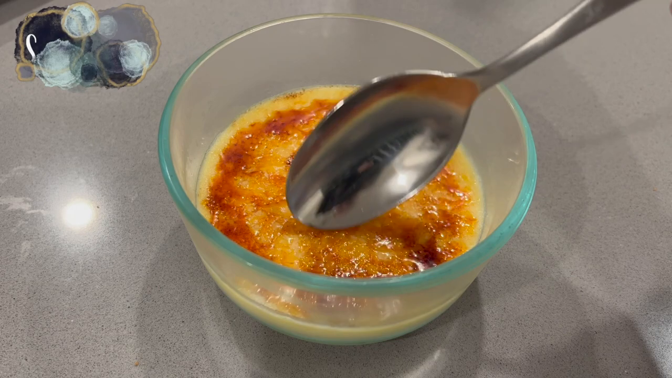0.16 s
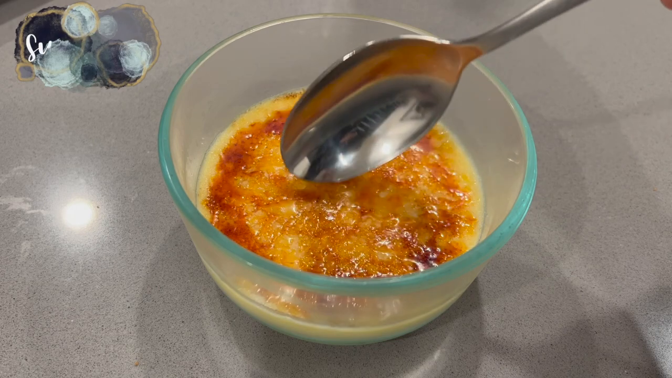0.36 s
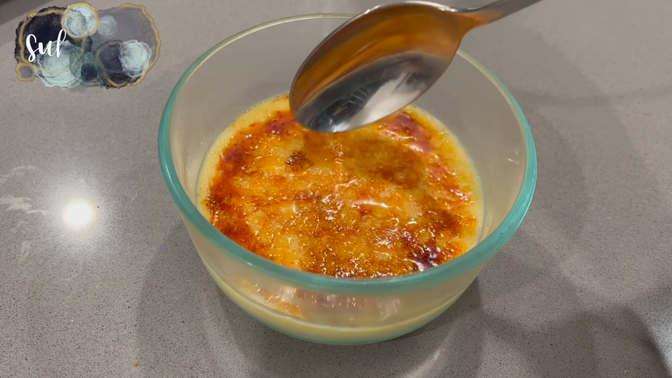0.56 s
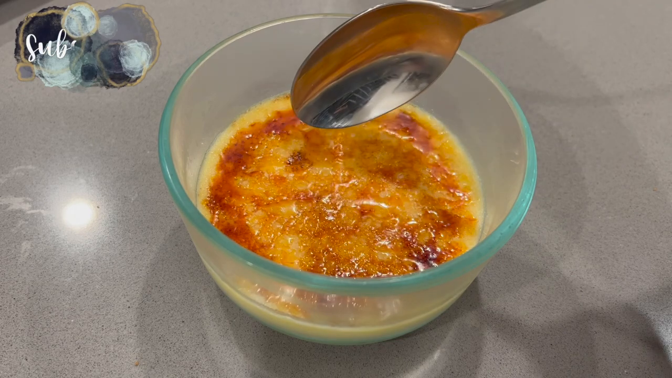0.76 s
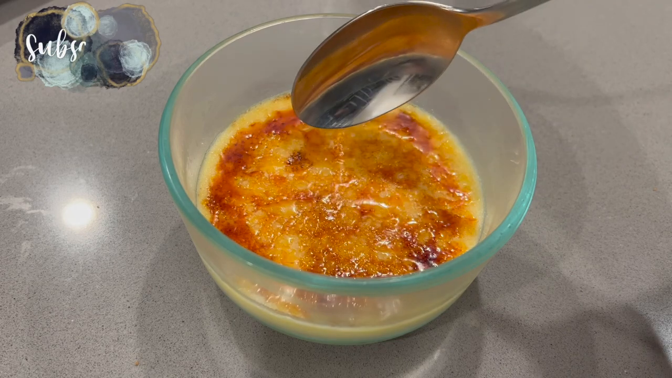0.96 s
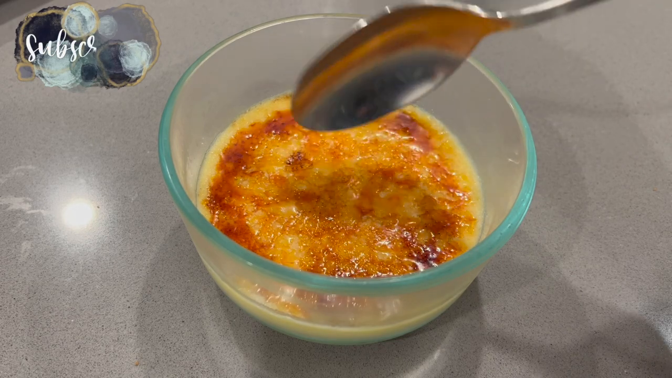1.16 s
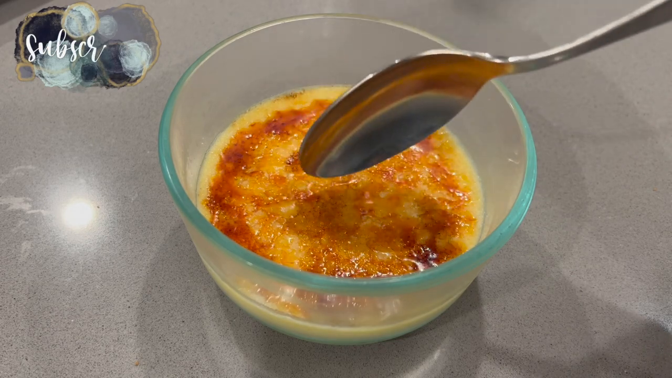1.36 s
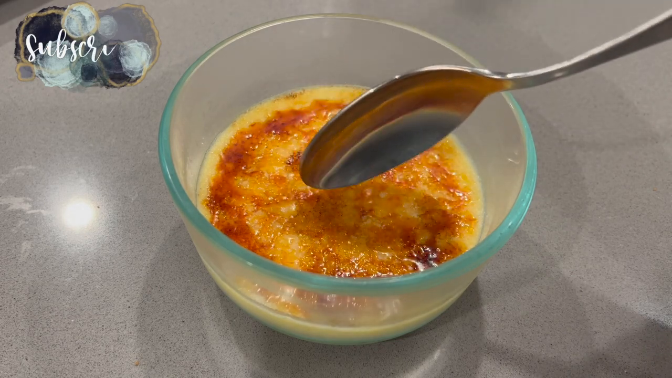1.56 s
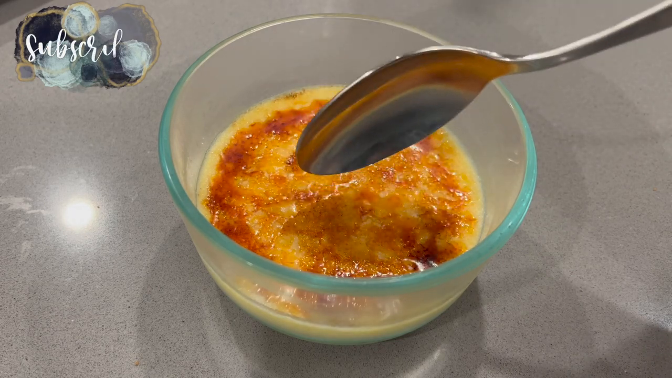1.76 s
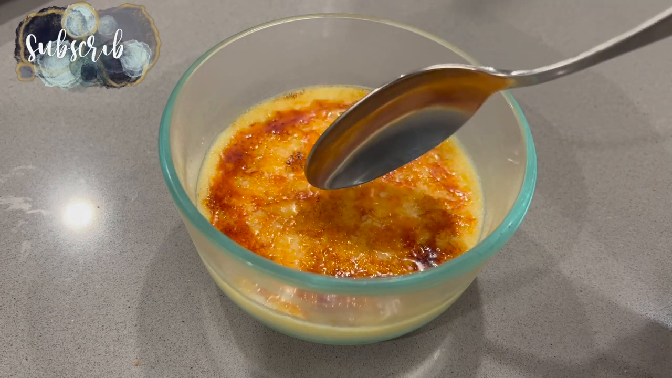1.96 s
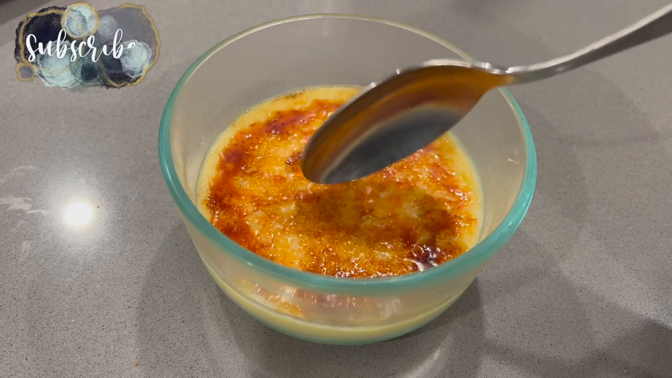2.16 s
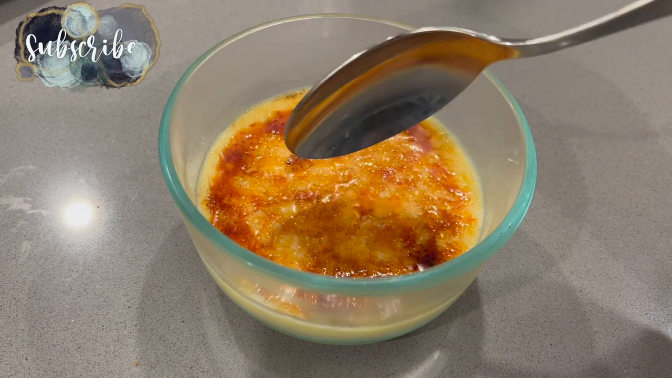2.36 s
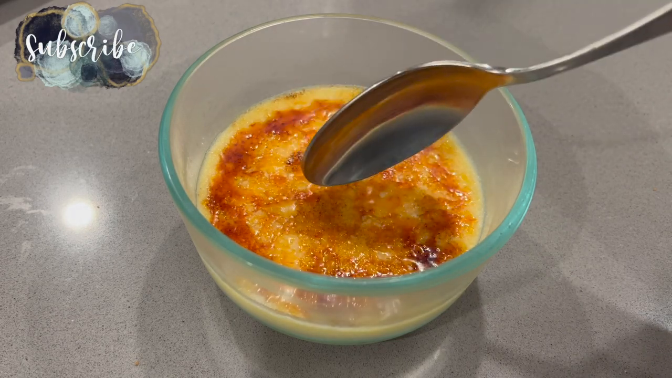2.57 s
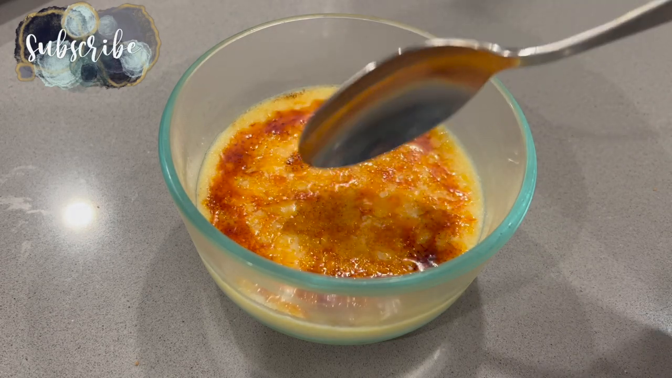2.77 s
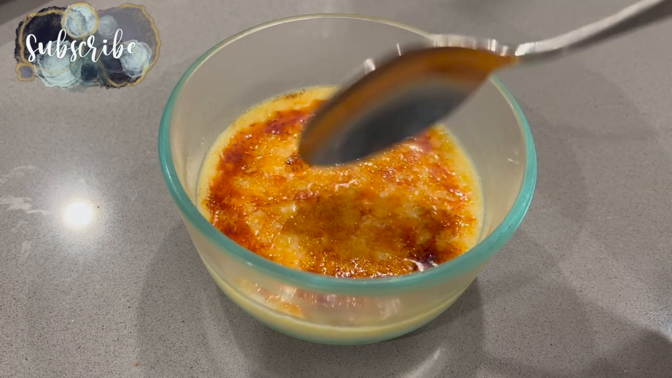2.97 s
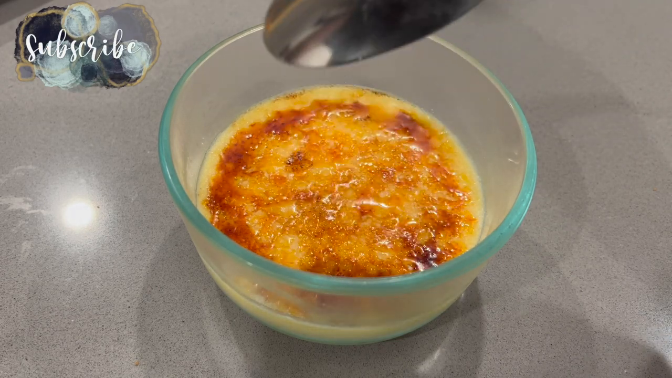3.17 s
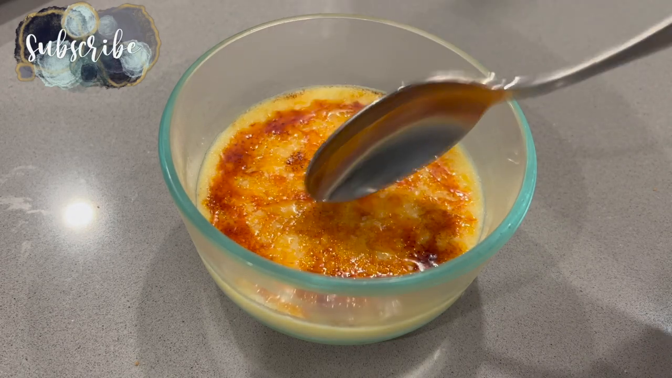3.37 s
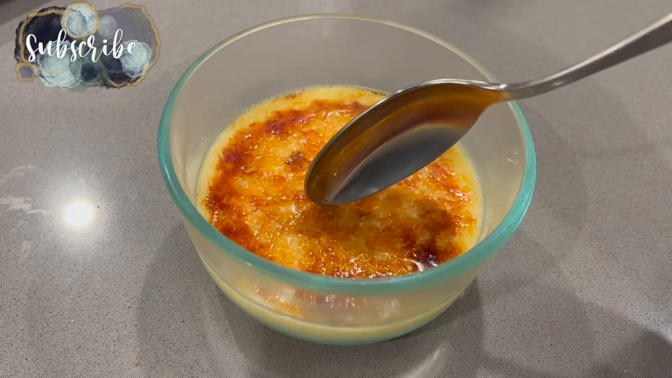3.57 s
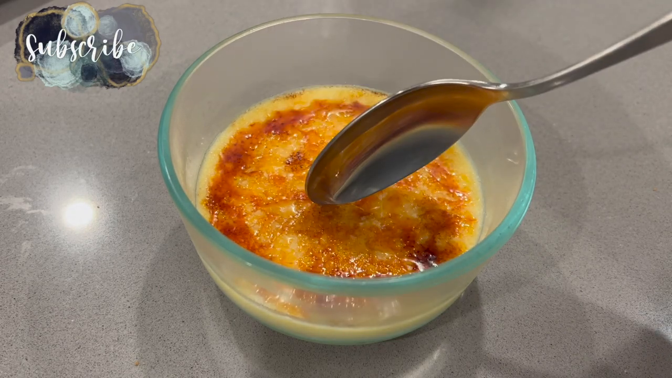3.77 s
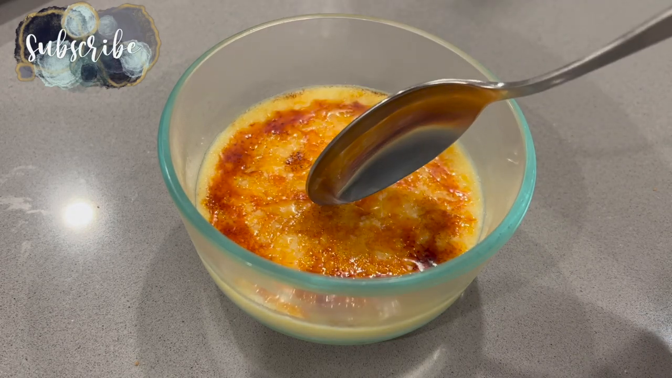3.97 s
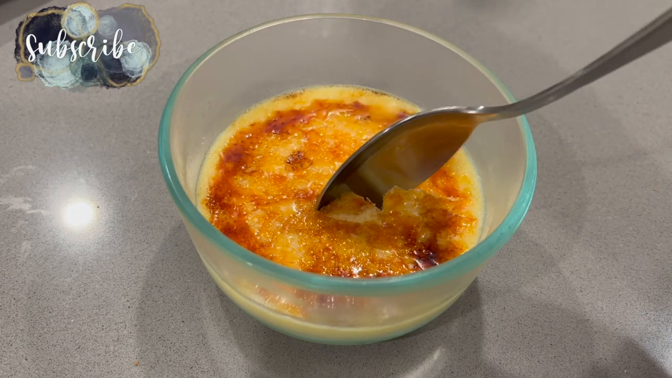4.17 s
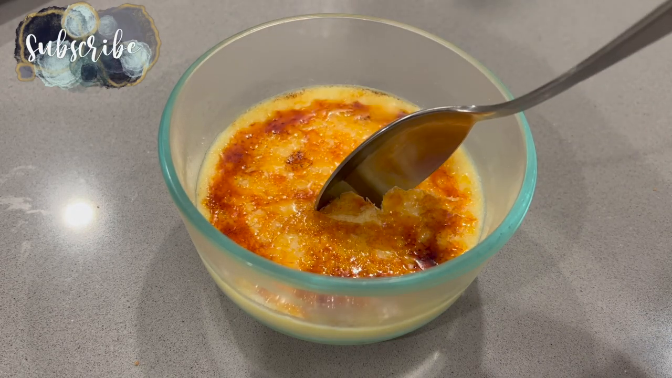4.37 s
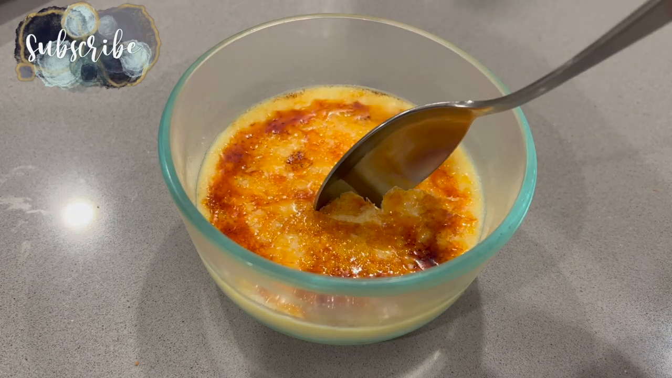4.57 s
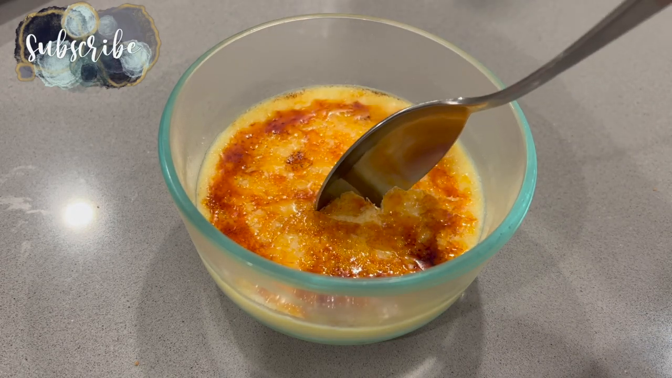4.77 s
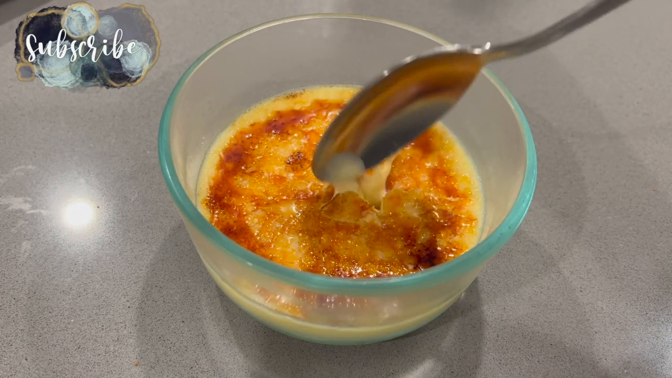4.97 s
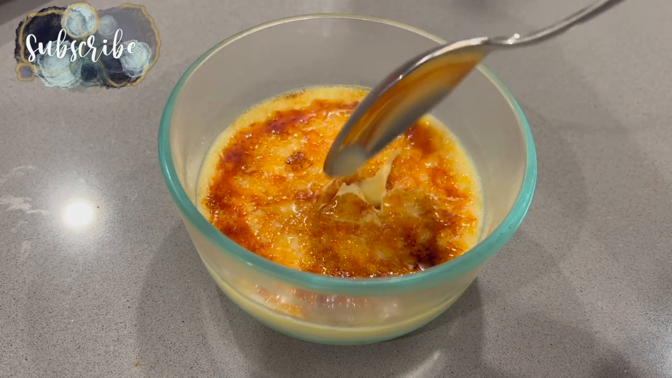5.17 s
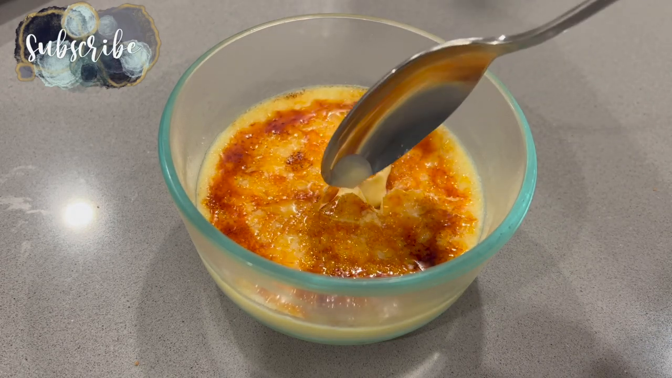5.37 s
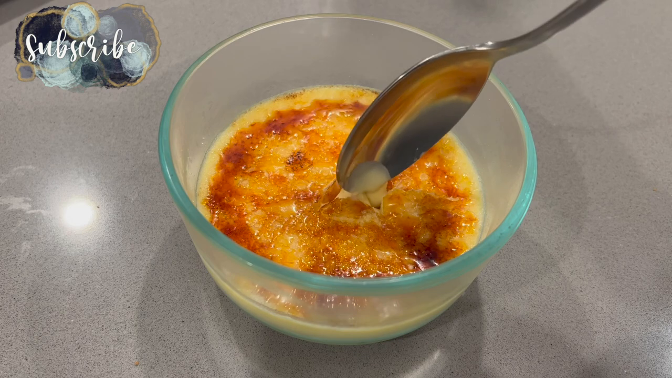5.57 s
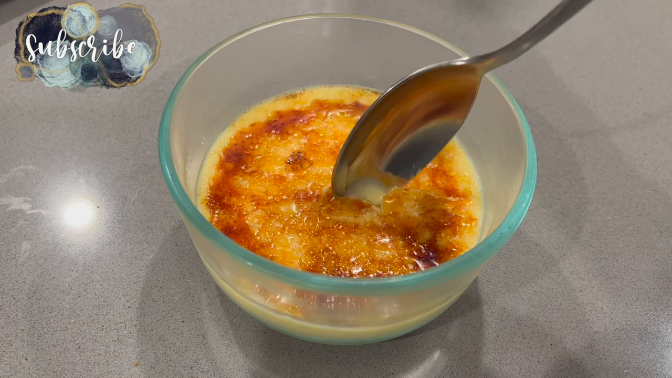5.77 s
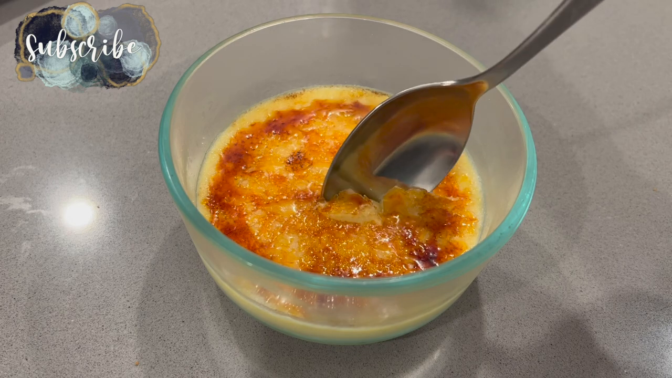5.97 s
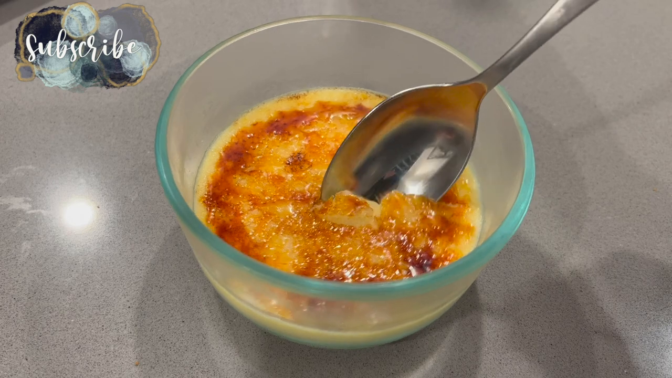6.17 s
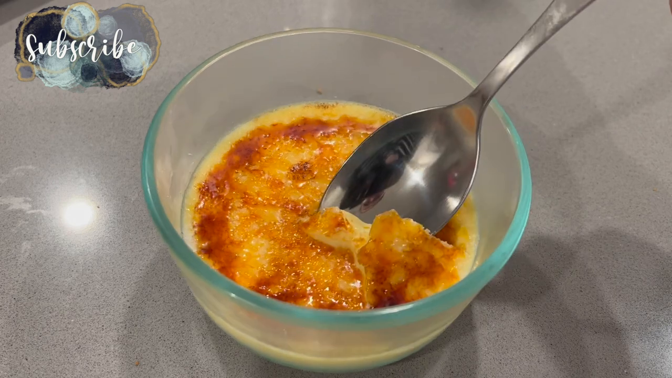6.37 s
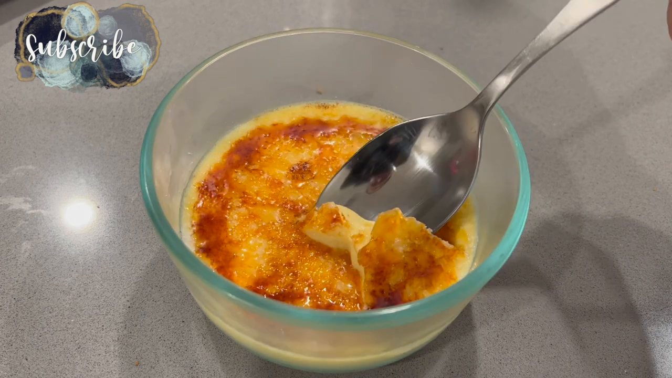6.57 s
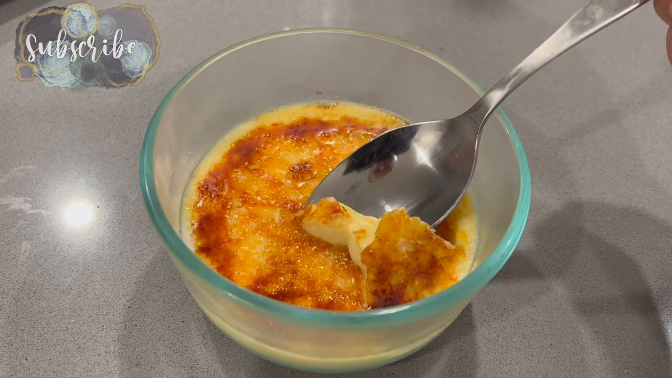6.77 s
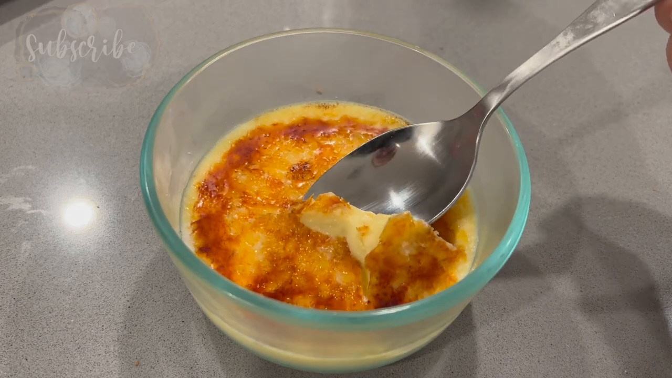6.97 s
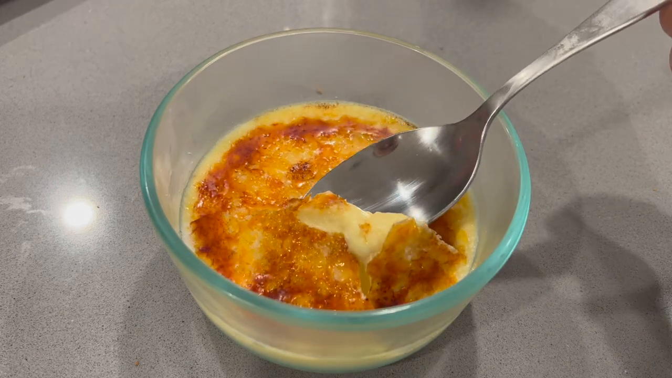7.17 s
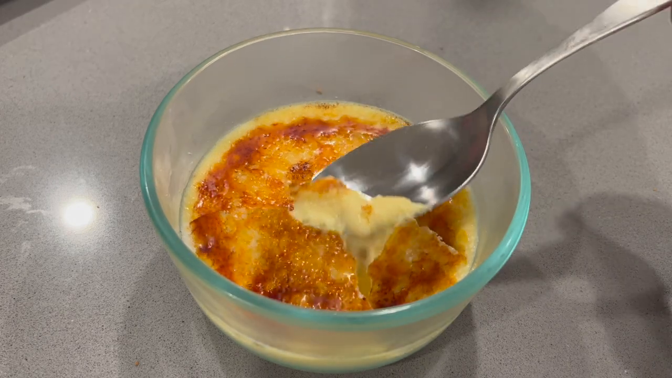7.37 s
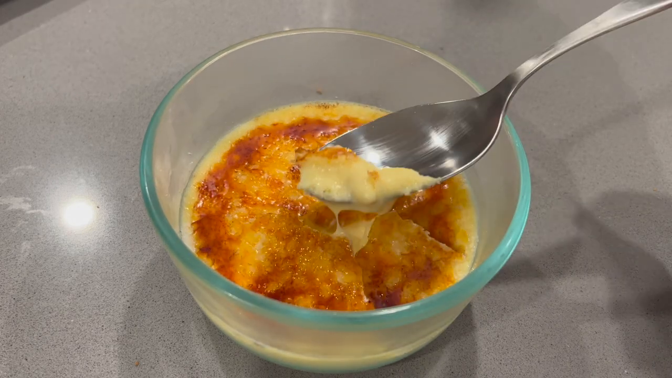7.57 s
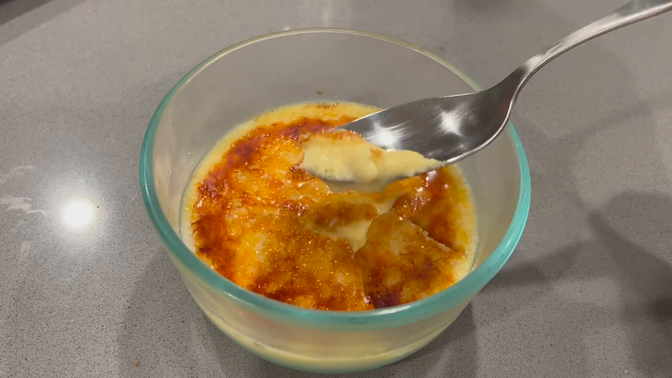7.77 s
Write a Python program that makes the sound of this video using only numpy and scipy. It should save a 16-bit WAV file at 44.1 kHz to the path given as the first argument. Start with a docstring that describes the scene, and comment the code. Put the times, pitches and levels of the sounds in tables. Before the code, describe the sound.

A metal spoon scrapes and taps a hard caramelized sugar crust in a glass dish, then cracks it sharply and crunches quietly through the shards.

```python
"""Close by, a steel spoon skids over the burnt sugar on a glass dish of custard, taps it five times,
then strikes harder until it cracks. It digs in, clinks, crunches the shards and clinks once more.
Blows are struck modes and bursts of noise; rubs are many tiny slips exciting the same bodies.
The kitchen answers briefly as decaying noise; behind it low rumble and an appliance's sine hum run on,
and near the end a far motor, a rising tone, spins up."""
import sys
import numpy as np
from scipy import signal
from scipy.fft import rfft, irfft, next_fast_len
from scipy.io import wavfile
from scipy.ndimage import uniform_filter1d, map_coordinates

SR = 44100
rng = np.random.default_rng(int(sys.argv[2]) if len(sys.argv) > 2 else 0)


def store_wav(level_fs):
    """Save 16-bit WAV to argv[1]."""
    pcm = np.round(np.clip(np.atleast_2d(level_fs), -1, 1) * 32767)
    wavfile.write(sys.argv[1], SR, pcm.T.astype(np.int16))


N = 345038

# spoon blows on the crust: t/s, knock level/dB, edge/dB (sugar's crack relative to the knock), room send/dB
BLOWS = [(1.551, -24, -16.5, -13), (1.8603, -25.5, -21.5, -13), (2.164, -23, -17, -13.5),
         (2.4735, -26.5, -16, -14), (2.81, -23.5, -16.5, -13), (3.357, -18, -10, -6),
         (4.1263, -26.5, -7.5, -5.5), (4.1523, -18.5, -1, -7.5), (5.8795, -30.5, -6.5, -13.5)]
# Mode tables: f/Hz, relative level/dB, undamped t60/s, left minus right/dB
# the custard's soft thump
CUSTARD_MODES = [(160, -3.5, 0.029, 0.5), (212.5, -4, 0.068, 1.5), (243, -14, 0.11, -0.5)]
# the dish's knock
DISH_MODES = [(431, -10, 0.023, 0.5), (554, -8, 0.025, 1), (746.4, 3, 0.022, 3.5), (805, -4, 0.032, 2.5),
              (961.7, -9.5, 0.049, 3), (1193, 0, 0.022, 3)]
# the sugar crust's clack
CRUST_MODES = [(1230.5, 5, 0.014, 6.5), (1637, -2.5, 0.0073, 4.5), (1731, -2, 0.018, 1.5),
               (2204, -6.5, 0.015, 14.5), (2560, -2, 0.0071, -4.5), (2860, -0.5, 0.0045, 11),
               (3931, -12.5, 0.0036, 0.5)]
# the spoon held against the crust
PRESSED_SPOON_MODES = [(5480, -4, .045, 2), (5720, -3.5, .045, 2), (8700, 2, .025, -2), (12300, -5, .02, 0),
                       (15300, -5, .02, 0)]
# cracking sugar: f/Hz, relative level/dB per Hz
CRACK_SPECTRUM = [(1500, -12), (3200, -0.5), (4300, -8.5), (5500, -2), (6800, -3.5), (8700, -2), (9500, -2),
                  (10400, -15), (12200, 2), (13400, -5), (15300, 0)]
# sugar grains rubbing on steel: f/Hz, relative level/dB per Hz
GRIT_SPECTRUM = [(1500, -3.5), (4300, -9), (6500, 2.5), (9000, -2.5), (10500, -12), (12300, 1), (13600, -8),
                 (15200, -3)]

LEVEL_SPAN = SR // 100  # a contact's level is its energy spread over 10 ms
TAP_EDGE_DB = -17  # the edge of a tap that leaves the crust whole
LIGHT_PITCH = 0.94  # pitch factor of the dish under a light contact


def blows():
    """Blows heard direct and off the walls: the more the sugar cracks, the more clack and less thump."""
    # the glass wall ringing on: f/Hz, relative level/dB, t60/s, left minus right/dB
    glass_modes = [(1207, 0, .42, 2), (1305, -1, .45, 2), (1580, -10, .4, 0), (1940, -11, .35, 0)]
    glass_db = -26.5  # each of the two glass rings, over the knock
    clack_db, clack_per_edge = -11.5, 0.79  # over the knock; growth with the edge, dB per dB
    thump_db, thump_per_edge = -4, 0.57  # over the knock; a breaking crust passes less on, dB per dB
    break_edge_db, broken_pitch = -4.5, 1.16  # above this edge the crust gives way; knock's pitch factor
    out = np.zeros((2, N))
    for s, knock_db, edge_db, room_db in BLOWS:
        bite_db = edge_db - TAP_EDGE_DB
        hit = strike(
            thump_db=knock_db + thump_db - thump_per_edge * bite_db,
            knock_db=knock_db,
            clack_db=knock_db + clack_db + clack_per_edge * bite_db,
            edge_level_db=knock_db + edge_db,
            pitch=broken_pitch if edge_db > break_edge_db else 1)
        add(out, s - .0005, hit)
        for _ in range(2):
            add(out, s, amp(knock_db + glass_db) * ring(glass_modes, scatter_db=1.5, detune=0))
        add(out, s - .0005, amp(room_db) * room(all_round(hit)))
    return out


def strike(thump_db, knock_db, clack_db, edge_level_db, pitch):
    """Steel bites sugar; crust, dish and custard answer. A heavy blow on whole crust shakes the worktop."""
    # the worktop under the dish: f/Hz, relative level/dB, t60/s, left minus right/dB
    counter_modes = [(81.94, -2.5, 0.08, 0), (126, -3, 0.086, -1.5)]
    heavy_db, counter_db = -20, -10  # knock that shakes the worktop; the thud over the knock
    thump_lag_s = 0.0035  # the soft custard answers later than the crust
    hit = np.zeros((2, SR // 5))
    add(hit, 0, amp(edge_level_db + 2.5) * burst(CRACK_SPECTRUM, t60=0.017))
    steel = ring(PRESSED_SPOON_MODES, scatter_db=4, detune=0.0041, damping=5.6)
    add(hit, 0, amp(edge_level_db - 7.5) * steel)
    add(hit, .0006, amp(clack_db) * ring(CRUST_MODES, scatter_db=2, detune=.015))
    add(hit, .0006, amp(knock_db) * ring(DISH_MODES, scatter_db=1, detune=.012, stretch=pitch))
    thump = ring(CUSTARD_MODES, scatter_db=2.5, detune=.02, attack=0.0022)
    add(hit, thump_lag_s, amp(thump_db) * thump)
    if knock_db > heavy_db and pitch == 1:
        thud = ring(counter_modes, scatter_db=0, detune=0, attack=0.0012)
        add(hit, .003, amp(knock_db + counter_db) * thud)
    return hit


def all_round(hit, band=1.19):
    """What a blow sends to the walls: summed over all directions, its modes blur into a smooth spectrum."""
    power = np.mean(np.abs(rfft(hit, 4096)) ** 2, axis=0)
    k = np.arange(len(power))
    low = (k / band).astype(int)
    high = np.minimum(k * band + 1, len(k)).astype(int)
    total = np.append(0, np.cumsum(power))
    smooth = np.sqrt(np.abs(total[high] - total[low]) / (high - low))
    return np.roll(irfft(smooth), 64)[None, :1024]


def rebounds():
    """The spoon chatters lightly after each blow: rows (t/s, knock/dB, edge/dB), breaking no more sugar."""
    # chatter after a blow: delay/s, knock level over the blow's/dB, edge/dB
    chatter = [(0.0098, -15, -13), (0.0211, -14, -14)]
    chatter_per_edge = 0.082  # a sharper blow chatters harder, dB per dB
    contacts = []
    for s, knock_db, edge_db, _ in BLOWS:
        sharper_db = chatter_per_edge * (edge_db - TAP_EDGE_DB)
        for delay, drop_db, light_edge_db in chatter:
            contacts.append((s + delay, knock_db + drop_db + sharper_db, light_edge_db))
    return contacts


def snaps():
    """Small catches, fractures and rebounds, each at a new spot of the crust, and flakes breaking off."""
    # the sugar catches, chips or snaps: t/s, knock level/dB, edge/dB over the knock
    catches = [(0.04, -38.5, -18), (0.066, -42.5, -18), (0.0978, -47, -15), (0.111, -37, -22),
               (0.124, -37.5, -15), (0.136, -37, -7.5), (0.144, -32, -10), (0.151, -36.5, -17),
               (0.166, -37, -18), (0.1905, -35, -10.5), (0.2099, -28.5, -13.5), (0.2254, -29.5, -23),
               (0.3738, -34.5, -27), (0.39, -36.5, -41), (0.435, -37, -22), (0.4522, -31.5, -19),
               (0.4892, -30.5, -23), (0.4964, -30.5, -29), (0.5135, -35.5, -25), (0.5325, -37.5, -8),
               (0.55, -35, -3), (0.5761, -33, -26), (3.3765, -26.5, -17), (3.3809, -26, -13),
               (3.3941, -33, -29), (3.8582, -56, -6.5), (3.8805, -69, 10), (3.966, -53.5, -3.5),
               (4.017, -53.5, 2), (4.027, -69, 13), (4.1037, -32.5, -10), (4.1165, -41, 9),
               (4.1315, -35, -9), (4.1389, -22.5, -20), (4.1715, -30, -20), (4.66, -64, -16),
               (4.8136, -75.5, 1), (5.702, -57.5, -18), (5.831, -50.5, -9.5), (5.963, -43, -9.5),
               (6.0052, -45.5, -13), (6.049, -52.5, -15.5), (6.081, -45.5, -41), (6.188, -58, -6.5),
               (6.2527, -57, 13.5), (6.268, -56.5, 5), (6.3894, -53, -37), (6.574, -66, -4),
               (6.588, -67.5, -3.5), (6.6538, -36, -18), (7.225, -60.5, 4), (7.2335, -58.5, 5),
               (7.251, -53, -8), (7.266, -50.5, -4), (7.29, -53.5, -6), (7.342, -54, -7),
               (7.388, -50.5, -16), (7.506, -47, -37)]
    # flakes of sugar breaking off: t/s, peak level/dB before flake_db
    flakes = [(0.1436, -34), (0.2094, -30.5), (0.2249, -31), (0.4883, -39.5), (0.4954, -27),
              (0.5295, -31.5), (0.5492, -29), (0.5746, -36), (3.3556, -30), (4.1515, -23), (5.879, -29),
              (6.6407, -33.5)]
    # a flake's ring: f/Hz, relative level/dB, undamped t60/s, left minus right/dB
    flake_modes = [(2120, -1, 0.035, 2.5), (2600, 0.5, 0.014, 6.5), (2960, 3, 0.021, -5),
                   (3210, -5, 0.013, -1.5)]
    flake_db = -11.5  # a flake's level over its peak
    clack_over_db, clack_per_edge = -4, 0.38  # over the knock; growth with the edge, dB per dB
    thump_over_db = -7.5  # the custard over the knock
    shard_pitch = 1.12  # a small piece of the crust rings higher than the whole
    # a firmer catch lasts longer, so its crack is duller
    light_knock_db, light_top_hz, dull_hz_per_db = -48, 15000, 260
    out = np.zeros((2, N))
    for s, knock_db, edge_db in rebounds() + list(catches):
        crack_db = knock_db + edge_db
        clack_db = knock_db + clack_over_db + clack_per_edge * edge_db
        top_hz = light_top_hz - dull_hz_per_db * (knock_db - light_knock_db)
        crack = filtered(burst(CRACK_SPECTRUM, t60=.011), lambda hz: 1 / (1 + (hz / top_hz) ** 8))
        add(out, s, amp(crack_db) * crack)
        add(out, s, amp(crack_db - 8) * ring(PRESSED_SPOON_MODES, scatter_db=3, detune=.008))
        add(out, s, amp(clack_db) * ring(CRUST_MODES, scatter_db=2.5, detune=.04, stretch=shard_pitch))
        knock = ring(DISH_MODES, scatter_db=3, detune=.09, stretch=LIGHT_PITCH, damping=1.4)
        add(out, s, amp(knock_db) * knock)
        add(out, s, amp(knock_db + thump_over_db) * ring(CUSTARD_MODES, scatter_db=2, detune=.08))
    for s, peak_db in flakes:
        add(out, s, amp(peak_db + flake_db) * ring(flake_modes, scatter_db=2, detune=.06, damping=1.3))
    return out


def scraping(spread_db=3.5, thump_db=-6, pressed_db=-7, count=6):
    """Dense tiny slips over the sugar grains, shared among a few spots of the crust."""
    # rubs and crunches: t/s at full pressure, hold/s, ramp/s, body level/dB,
    # grit over the body/dB, steel over the body/dB, slips per second
    strokes = [(0.15, 0.077, 0.16, -37, -24.5, -32, 700), (0.376, 0.011, 0.19, -41.5, -19.5, -20, 620),
               (0.462, 0.082, 0.11, -39, -19, -18, 840), (4, 0.16, 0.4, -64.5, -2, -9.5, 530),
               (4.117, 0.033, 0.035, -35, -4.5, -24, 730), (5.86, 0.14, 0.21, -50, -14.5, -17, 400),
               (6.251, 0.042, 0.14, -52, -14.5, -17.5, 400), (6.683, 0.048, 0.1, -53, -13, -12, 1300),
               (6.85, 0.012, 0.4, -61.5, -12.5, -16, 500), (7.17, 0.019, .06, -66.5, 0.5, -1, 1200),
               (7.255, 0.084, 0.12, -54, -5, -4, 1320)]
    # the spoon sings as it rubs: f/Hz, relative level/dB, t60/s, left minus right/dB
    rubbed_spoon_modes = [(1314, 0, .05, 0), (5530, 0, .03, 1)]
    # crust over dish, dB, and dB per dB of grit; loose, gritty shards pass less to the dish
    clack_over_db, clack_per_grit = 1, 0.39
    out = np.zeros((2, N))
    for s, hold, ramp, body_db, grit_db, steel_db, rate in strokes:
        t, force = pressure(s, hold, ramp)
        body = amp(body_db) * force
        grit = amp(body_db + grit_db) * force
        clack_db = clack_over_db + clack_per_grit * grit_db
        for _ in range(count):
            when, size = rng.random((2, len(t)))
            sizes = amp(-spread_db * np.log(size + 0.012))  # many small slips, few large
            slips = unit((when < rate / count / SR) * sizes) / np.sqrt(count * LEVEL_SPAN)
            low, high = np.zeros((2, 2, SR // 10))
            add(low, 0, ring(DISH_MODES, scatter_db=3, detune=.1, stretch=LIGHT_PITCH, damping=1.4))
            add(low, 0, amp(clack_db) * ring(CRUST_MODES, scatter_db=3, detune=.05))
            add(low, 0, amp(thump_db) * ring(CUSTARD_MODES, scatter_db=2, detune=.1))
            add(high, 0, burst(GRIT_SPECTRUM, t60=0.019))
            add(high, 0, amp(pressed_db) * ring(PRESSED_SPOON_MODES, scatter_db=2, detune=.008))
            add(high, 0, amp(steel_db - grit_db) * ring(rubbed_spoon_modes, scatter_db=1, detune=.012))
            add(out, t[0], signal.fftconvolve((body * slips)[None], unit_hit(low), axes=1))
            add(out, t[0], signal.fftconvolve((grit * slips)[None], high, axes=1))
    return out


def pressure(s, hold, ramp):
    """A stroke swells, holds unevenly and lets go: its sample times and its gain at each."""
    ramp_db, release_share = 25, 0.73  # swell over one ramp; release time over ramp time
    foot = 0.98  # how many ramps away from full pressure the spoon still touches
    catch_db, catches_per_s = 2.5, 90  # the spoon sticks and lets go, so its pressure is uneven
    release = release_share * ramp
    start = max(0, round((s - foot * ramp) * SR))
    t = np.arange(start, round((s + hold + foot * release) * SR)) / SR
    knots = rng.standard_normal(int(2 * catches_per_s))
    catches = map_coordinates(knots, [(t - t[0]) * catches_per_s])
    ramps_away = np.maximum(s - t, 0) / ramp + np.maximum(t - s - hold, 0) / release
    return t, amp(catch_db * catches - ramp_db * ramps_away)


def clinks():
    """The spoon slips off a shard and rings freely into the room."""
    # light touches: t/s, knock/dB, clack/dB, steel/dB, grit/dB, damping factor, pitch factor
    touches = [(6.6416, -39, -39, -34.5, -48, 4.7, 1.014), (7.476, -46.5, -41, -38, -54.5, 2.4, 1)]
    # the free spoon: f/Hz, relative level/dB, undamped t60/s, left minus right/dB
    spoon_modes = [(1168, -20, .3, 0), (1314, -12, .25, 0), (3480, -7, .02, 2), (5410, -11, .22, 1),
                   (5500, -1, .03, 2), (8215, -1, .05, -1), (11500, 2, .045, 0)]
    room_db = -9.5  # lifted clear of the dish, the ringing spoon sends more to the walls
    out = np.zeros((2, N))
    for s, knock_db, clack_db, steel_db, grit_db, damping, pitch in touches:
        free_ring = ring(spoon_modes, scatter_db=1, detune=.0005, stretch=pitch, damping=damping)
        steel = amp(steel_db) * free_ring
        add(out, s, steel)
        add(out, s, amp(room_db) * room(steel))
        add(out, s, amp(grit_db) * burst(GRIT_SPECTRUM, t60=.012))
        add(out, s, amp(clack_db) * ring(CRUST_MODES, scatter_db=1.5, detune=.03))
        add(out, s, amp(knock_db) * ring(DISH_MODES, scatter_db=1.5, detune=.03, stretch=1.25))
    return out


def ring(modes, scatter_db, detune, stretch=1, damping=1, attack=0.00045, lead=.00005):
    """Struck modes; strength and pitch vary with the spot hit, and the left microphone's phase leads."""
    hz, db, t60, pan_db = np.transpose(modes)[:, :, None]
    t = np.arange(int(1.2 * t60.max() * SR)) / SR
    chance = rng.standard_normal((2, len(modes), 1))
    hz = hz * stretch * np.exp(detune * chance[0])
    decay = amp(db + scatter_db * chance[1] - 60 * damping * t / t60)
    gain = decay * (1 - np.exp(-t / attack))
    channels = []
    for side in (1, -1):
        tone = np.sin(2 * np.pi * hz * (t + side * lead / 2))
        channels.append(amp(side * pan_db / 2) * gain * tone)
    # a small body radiates little below its lowest mode
    radiating = signal.butter(2, hz.min() / 2, "high", fs=SR)
    return unit_hit(signal.lfilter(*radiating, np.sum(channels, axis=1)))


def burst(spectrum, t60, lump_db=2, apart_hz=4800):
    """A brittle burst of tiny fractures; its treble reaches both microphones alike."""
    t = np.arange(1024) / SR
    fractures = rng.standard_normal((2, len(t))) * amp(lump_db * rng.standard_normal(len(t)))

    def colour(hz):
        width = 2.4 / (1 + (hz / apart_hz) ** 2)
        return amp(along(spectrum, hz)) * np.array([np.ones_like(hz), width])

    mid, side = filtered(fractures, colour)
    envelope = amp(-60 * t / t60) * (1 - np.exp(-t / 0.00082))
    return unit_hit(np.array([mid + side, mid - side]) * envelope)


def room(x):
    """The kitchen's uneven answer: decaying noise, each frequency dying at its own speed."""
    # decay of the kitchen: f/Hz, t60/s
    room_t60 = [(120, 0.8), (500, 0.42), (1300, 0.6), (4000, 0.48), (8000, 0.5), (14000, 0.19)]
    # colour of its answer: f/Hz, relative level/dB
    room_colour = [(100, -6.5), (300, 0.5), (1300, 0), (1600, -3.5), (2100, 3.5), (2600, -4.5), (3300, 0),
                   (7000, -3.5), (10500, -6), (15000, -3)]
    gap_s, build_s, alike_hz = 0.005, 0.0011, 500
    patchy_db = 2.5  # some reflections arrive bunched, others cancel
    hz, t, z = signal.stft(rng.standard_normal((2, int(SR * .7))), SR, nperseg=256)
    patches = uniform_filter1d(rng.standard_normal(z.shape[1:]), size=2, axis=0)
    patches = unit(uniform_filter1d(patches, size=20, axis=1))
    decay_db = along(room_colour, hz)[:, None] - 60 * t / along(room_t60, hz)[:, None]
    fade = amp(decay_db) * unit(amp(patchy_db * patches))
    mid, side = signal.istft(z * fade, SR, nperseg=256)[1]
    side = filtered(side, lambda hz: hz / (hz + alike_hz))  # long waves reach both microphones alike
    swell = 1 - np.exp(-np.maximum(np.arange(len(mid)) / SR - gap_s, 0) / build_s)
    tail = np.array([mid + side, mid - side]) * swell * np.sqrt(20 / SR)
    return signal.fftconvolve(x.mean(axis=0)[None], tail, axes=1)


def motor():
    """A far motor spins up; its drone swells and sinks as it passes the room's resonances."""
    # room resonances: f/Hz, half width/Hz, level added to the drone/dB
    resonances = [(76.5, 3.9, -41.5), (98.5, 0.95, -38.5), (111.1, 3.7, -39)]
    start_s, start_hz, hz_per_s, full_hz = 6.79, 68, 90, 120
    drone_db, shaft_db, fade_s = -69.5, -56.5, 0.062  # off resonance; shaft an octave below; onset
    t = np.maximum(np.arange(N) / SR - start_s, 0)
    hz = np.minimum(start_hz + hz_per_s * t, full_hz)
    phase = 2 * np.pi * np.cumsum(hz) / SR
    drone = amp(drone_db)
    for centre, width, db in resonances:
        drone = drone + amp(db) / (1 + ((hz - centre) / width) ** 2)
    tones = drone * np.sin(phase) + amp(shaft_db) * np.sin(phase / 2)
    return np.sqrt(2) * np.minimum(t / fade_s, 1) * tones


def background():
    """Low room rumble from coloured noise, and an appliance's sines wavering in level and phase."""
    # rumble and air: f/Hz, relative level/dB per Hz
    air_spectrum = [(20, -38.5), (43, -10.5), (123, -5), (195, -15.5), (236, -13.5), (270, -16.5),
                    (405, -24), (677, -23), (911, -36), (988, -31.5), (1600, -44.5), (10100, -56),
                    (16000, -64.5)]
    # likeness of the two microphones: f/Hz, left-right correlation
    air_alike = [(100, 0.94), (300, 0.53), (1000, 0.067), (4000, 0.064)]
    # appliance lines: f/Hz, mid level/dB (rms)
    hum_lines = [(119, -63), (241, -69.5)]

    def colour(hz):
        turn = np.arccos(np.clip(along(air_alike, hz), -1, 1)) / 2
        return amp(along(air_spectrum, hz)) * np.array([np.cos(turn), np.sin(turn)])

    mid, side = filtered(rng.standard_normal((2, N)), colour)
    air = amp(-57.5) * unit(np.array([mid + side, mid - side]))
    t = np.arange(N) / SR
    hum = np.zeros(N)
    for hz, db in hum_lines:
        hum += amp(db + 3.5 * wobble(5.7)) * np.sin(2 * np.pi * hz * t + .5 * wobble(5.4))
    return air + np.sqrt(2) * hum


def amp(db):
    """Decibels to gain."""
    return 10 ** (np.asarray(db) / 20)


def unit(x):
    """Scale to rms 1."""
    return x / np.sqrt(np.mean(x ** 2) + 1e-20)


def unit_hit(x):
    """Scale a stereo transient to a level of 0 dB."""
    return x * np.sqrt(2 * LEVEL_SPAN / np.sum(x ** 2))


def along(points, hz):
    """Read (f/Hz, value) points on a log frequency axis."""
    f, v = np.transpose(points)
    return np.interp(np.log(hz + 1), np.log(f), v)


def wobble(rate):
    """A smooth random curve, rate knots a second."""
    knots = rng.standard_normal(int(N * rate / SR) + 4)
    return map_coordinates(knots, [np.arange(N) * rate / SR])


def filtered(x, response):
    """Filter x by a response of frequency in Hz."""
    n = x.shape[-1]
    m = next_fast_len(n + 4096)
    return irfft(rfft(x, m) * response(np.fft.rfftfreq(m, 1 / SR)), m)[..., :n]


def add(track, s, sound):
    """Mix a sound into a track from time s in seconds."""
    part = track[:, max(0, round(s * SR)):][:, :sound.shape[1]]
    part += sound[:, :part.shape[1]]


def scene():
    """Spoon and dish close by, the kitchen around them."""
    small = snaps() + clinks() + scraping()
    answer = amp(-13.5) * room(small)[:, :N]
    return blows() + small + answer + motor() + background()


def record(dry):
    """The recorder drops the deepest rumble, rounds the highest peaks and cuts off above its band limit."""
    top_hz = 16200
    low_cut = signal.butter(2, 40, "high", fs=SR)
    x = signal.lfilter(*low_cut, dry)
    x = x / (1 + (x / .8) ** 4) ** (1 / 4)
    return filtered(x, lambda hz: 1 / (1 + (hz / top_hz) ** 120))


dry = scene()
out = record(dry)
store_wav(out)
```